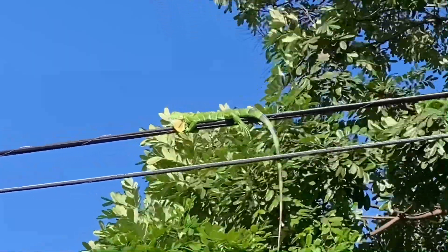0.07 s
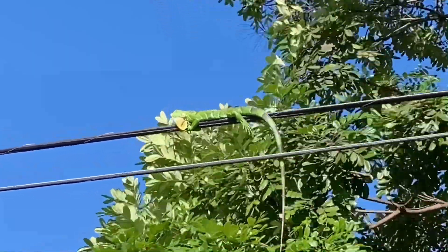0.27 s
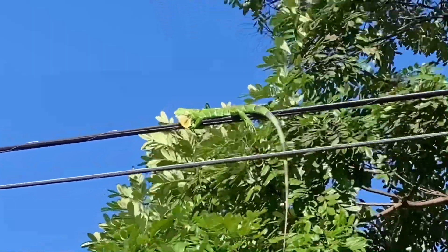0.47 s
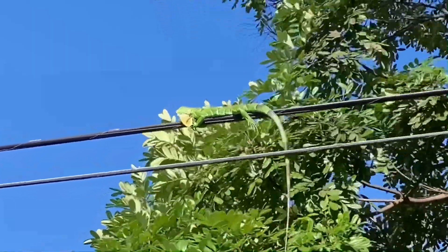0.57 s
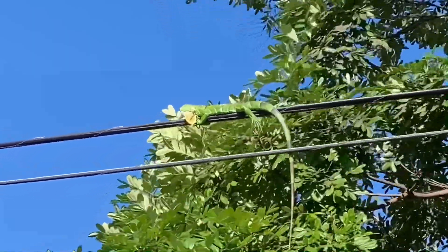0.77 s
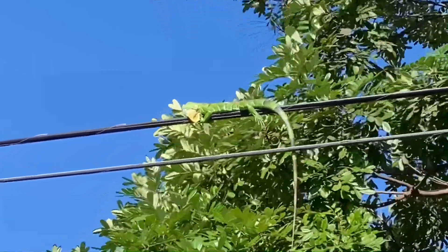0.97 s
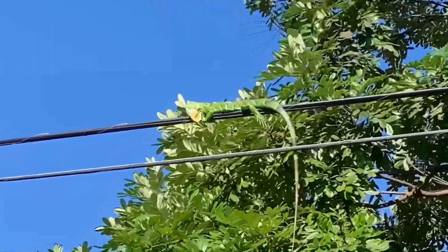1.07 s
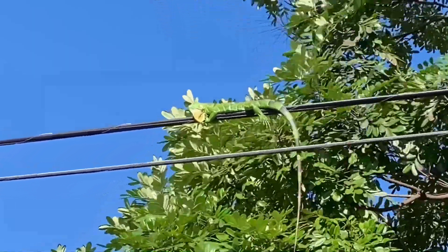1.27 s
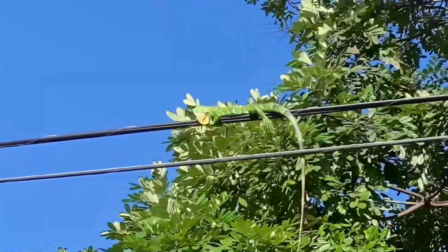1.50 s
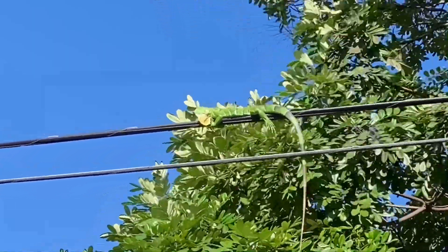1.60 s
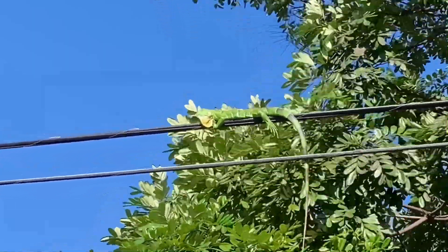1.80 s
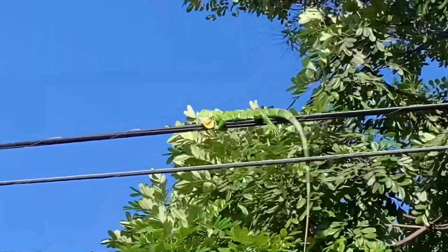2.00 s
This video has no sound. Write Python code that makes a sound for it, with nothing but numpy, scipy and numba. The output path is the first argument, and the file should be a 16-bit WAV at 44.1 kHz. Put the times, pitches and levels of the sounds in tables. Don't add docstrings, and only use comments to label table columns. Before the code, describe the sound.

Wind blasts a handheld stereo microphone outdoors. It opens with loud rumble, flutter and a tight cluster of snaps on the left, easing after 0.3 seconds into uneven low thumps and brief lulls. Around 1.4 seconds heavy flutter and crackle return, with one hard slap at 1.55 and a strong fluttering puff near 1.8. Faint steady leaf hiss and a barely audible wire hum lie beneath.

```python
import sys
import numpy as np
from scipy import signal
from scipy.fft import rfft, irfft
from scipy.io import wavfile
from scipy.ndimage import uniform_filter1d, minimum_filter1d
from numba import njit

SR = 44100
rng = np.random.default_rng(int(sys.argv[2]) if len(sys.argv) > 2 else 0)


def to_wav(s):
    ch = np.atleast_2d(s).T
    pcm = np.round(np.clip(ch, -1, 1) * 32767)
    wavfile.write(sys.argv[1], SR, pcm.astype(np.int16))


def boost(x):
    u = np.asarray(x, float) / 20
    return 10 ** u


N = 90228


def walk(rate_hz):
    hold = int(SR / rate_hz)
    steps = np.repeat(rng.standard_normal(N // hold + 1), hold)
    return 1.29 * uniform_filter1d(uniform_filter1d(steps, hold), hold)[:N]


def unit(x):
    return x / np.sqrt(np.mean(x ** 2))


def pair(like):
    mid, side = rng.standard_normal((2, N))
    opposite = np.array([[1], [-1]])
    return (np.sqrt(1 + like) * mid + np.sqrt(1 - like) * side * opposite) / np.sqrt(2)


def colour(hz, table):
    table_hz, table_db = np.array(table).T
    return boost(np.interp(np.log(hz + 1), np.log(table_hz), table_db))


@njit
def svf(x, hz, q):
    band, low, b, l = np.empty(len(x)), np.empty(len(x)), 0., 0.
    for i in range(len(x)):
        g = np.tan(np.pi * hz[i] / SR)
        v = (b + g * (x[i] - l)) / (1 + g * (g + 1 / q))
        band[i], low[i] = v / q, l + g * v
        b, l = 2 * v - b, l + 2 * g * v
    return band, low


def puffs(t, starts, holds, attack, release):
    late = t[None] - starts[:, None]
    rise = np.minimum(late / attack - 1, 0)
    fall = np.minimum((holds[:, None] - late) / release, 0)
    return np.exp(rise + fall)


def power(shapes, dbs):
    return np.sqrt(boost(dbs) ** 2 @ shapes ** 2) + 1e-6


def strongest_pitch(shapes, dbs, pitches):
    return (boost(dbs) ** 2 * pitches) @ shapes ** 2 / power(shapes, dbs) ** 2


def even(x, span_s):
    swell = uniform_filter1d(np.mean(unit(x) ** 2, axis=0), int(span_s * SR)) + 0.069
    return unit(x * swell ** (-0.72 / 2))


# start_s, level_db
GUSTS = [(0.0, -19.5), (0.04, -16), (0.29, -16), (0.36, -27), (0.46, -33), (0.5, -18), (0.7, -27.5),
         (0.79, -16.5), (0.93, -28), (0.94, -25.5), (1.08, -30), (1.16, -21.5), (1.29, -22.5),
         (1.58, -15.5), (1.62, -17.5), (1.73, -17.5), (1.9, -22), (1.93, -20.5), (2.04, -18.5)]
# frequency_hz, level_db
RUMBLE_SPECTRUM = [(12, -44.5), (20, -9.5), (65, 0.5), (125, -2.5), (184, -11), (247, -15), (282, -21.5),
                   (392, -30), (700, -45), (910, -61), (1540, -120)]


def rumble(t):
    hz = np.fft.rfftfreq(N, 1 / SR)
    spectrum = rfft(pair(0.66)) * colour(hz, RUMBLE_SPECTRUM)
    gust = boost(np.interp(t, *np.array(GUSTS).T) - 3)
    shared = walk(14)
    out = 0
    for centre_hz in 25 * 2 ** np.arange(0, 5.1, .5):
        octaves = np.log2((hz + 1) / centre_hz)
        share = np.cos(np.pi * np.clip(octaves, -.5, .5)) ** 2
        brightness_db = 0.078 * (20 * np.log10(gust) + 24) + .9 * shared
        flicker_db = np.log2(centre_hz / 50) * brightness_db + 4.6 * walk(24.97)
        out = out + irfft(spectrum * share, N) * boost(flicker_db)
    return even(out, 0.035) * gust


# start_s, peak_db, pitch_hz, hold_s
THUMPS = [(0.03, -12, 220, .015), (0.05, -9, 125, 0.026), (0.097, -12.5, 66, 0.012),
          (0.2, -15.5, 123, 0.024), (0.265, -14.5, 108, 0.03), (0.491, -11, 54.7, 0.02),
          (0.577, -20.5, 176, 0.027), (0.651, -25.5, 47.3, 0.018), (0.77, -10, 64, 0.019),
          (0.804, -13.5, 75, 0.037), (0.927, -18.5, 77, 0.023), (1.137, -8.5, 65, 0.045),
          (1.203, -12, 67.3, 0.025), (1.262, -18, 86.5, 0.046), (1.328, -15.5, 132.4, 0.052),
          (1.388, -9, 230, 0.05), (1.453, -10.5, 167, 0.021), (1.533, -10, 141.4, 0.025),
          (1.626, -18, 75.8, 0.015), (1.66, -14, 190, .015), (1.695, -7, 68.4, 0.021),
          (1.747, -13.5, 94.2, 0.03), (1.848, -21, 74.5, 0.012), (1.914, -14, 45.4, 0.024),
          (2, -20.5, 169, 0.029)]


def thumps(t):
    start, db, pitch, hold = np.array(THUMPS).T
    shapes = puffs(t, start, hold, attack=0.0048, release=0.021)
    hz = strongest_pitch(shapes, db, pitch) + 1
    q = 1.41
    band = np.array([svf(svf(x, hz, q)[0], hz, q)[0] for x in pair(0.74)])
    return even(band * (80 / hz) ** .5, 0.029) * power(shapes, db) * boost(-7)


# start_s, peak_db, crackle_over_peak_db, pitch_hz, hold_s
EDDIES = [(0.022, -11.5, -4, 229, 0.019), (0.04, -13.5, -13, 268, 0.013), (0.072, -14, -20, 252, 0.015),
          (0.159, -22, -17.5, 283, 0.029), (0.205, -15.5, -22, 340, 0.014), (0.25, -16, -14.5, 254, 0.022),
          (0.536, -27.5, -22, 337, 0.021), (0.569, -19.5, -27, 314, 0.015),
          (0.7735, -19, -21.5, 290, 0.015), (0.806, -22, -43, 305, 0.018), (1.148, -21.5, -33, 324, 0.013),
          (1.175, -19.5, -48.5, 309, 0.014), (1.308, -24.5, -29, 360, 0.019),
          (1.387, -7.5, -16, 265, 0.017), (1.407, -8, -15.5, 376, 0.03), (1.435, -10.5, -7.5, 336, 0.019),
          (1.454, -9.5, -16.5, 367, 0.023), (1.479, -20, -10, 396, 0.016), (1.525, -15, -11, 264, 0.017),
          (1.712, -16.5, -8.5, 253, 0.016), (1.751, -22, -15, 330, .008), (1.764, -14, -23, 287, 0.018),
          (1.784, -8, -31, 454, 0.011), (1.998, -17.5, -22, 300, 0.02)]
# start_s, peak_db, crackle_over_peak_db, pitch_hz, hold_s
FLICKS = [(0.13, -20.5, -17, 260, 0.0076), (0.291, -25, -19, 292, 0.0033), (0.327, -31, -9, 350, 0.0037),
          (0.553, -25, -29, 281, 0.0081), (0.65, -32, -25, 262, 0.0043), (0.691, -28, -40, 280, 0.0071),
          (0.843, -27.5, -26, 269, 0.0099), (0.942, -17.5, -33, 297, 0.006), (1.24, -41.5, -20, 252, 0.01),
          (1.348, -24, -32, 356, 0.0065), (1.507, -12, -37, 393, 0.0048), (1.551, -14, -12, 326, 0.004),
          (1.604, -11, -24, 242, 0.0034), (1.656, -11, -18.5, 250, 0.007), (1.7, -19, -9, 297, 0.006),
          (1.799, -1.5, -26, 398, 0.0055), (1.853, -21.5, -29, 300, 0.006), (1.91, -28, -28, 315, 0.0052),
          (1.944, -28.5, -32, 330, 0.011)]
# start_s, peak_db, crackle_over_peak_db, pitch_hz, hold_s
WHIPS = [
    (0.027, -12, -14, 600, 0.017),
    (1.78, -10.5, -25, 500, .022),
    (.128, -24.5, -11, 482, .004),
    (.252, -18, -12, 479, .005),
    (.518, -29.5, -15, 448, 0.0035),
    (0.547, -26, -18, 448, .005),
    (1.352, -25, -15, 448, .004),
    (1.663, -17.5, -20, 478, 0.0047),
]


def flutter(t):
    start, db, crackle_db, pitch, hold = np.array(EDDIES + FLICKS + WHIPS).T
    shapes = puffs(t, start, hold, attack=0.00302, release=0.0045)
    hz = np.clip(strongest_pitch(shapes, db, pitch), 150, 900) * boost(0.55 * walk(60))

    body = []
    for x in pair(0.93):
        x = svf(svf(x, hz, 1.25)[0], hz, 1.25)[0]
        body.append(svf(x, 1.76 * hz, 0.47)[1])
    body[1] = svf(body[1], 2.08 * hz, 0.68)[1]
    body = even(np.array(body) * (300 / hz) ** .5, 0.0068)

    crests = np.maximum(np.abs(body[0]) - .8, 0) ** 1.88
    grit = crests * np.sign(body[0]) * 0.77 + pair(0.98) * (0.083 + crests)
    grit = grit * boost(1.4 * walk(150))
    edge_hz = np.full(N, 883.)
    crackle = []
    for x in grit:
        x = svf(svf(x, edge_hz, 0.94)[0], 1.25 * edge_hz, 0.86)[1]
        crackle.append(svf(x, 1.52 * edge_hz, 0.5)[1])
    crackle = unit(np.array(crackle)) * power(shapes, db + crackle_db)

    body = body * power(shapes, db) * boost(np.array([[-2.8], [-3.1]]))
    return body + crackle * boost(np.array([[-.6], [-20]]))


# start_s, peak_db, width_ms, direction (push 1, suck -1)
SNAPS = [(.0262, -14, 0.32, 1), (.0330, -7, 0.21, -1), (.0347, -5.5, 0.23, 1), (0.0387, -3, 0.24, 1),
         (.0413, -7, .2, -1), (.0445, -4.5, 0.36, -1), (.1315, -27, .25, 1), (.1665, -29, 0.33, -1),
         (.2075, -27, .35, 1), (.2545, -18, 0.29, 1), (.2935, -27, 0.32, -1), (0.5208, -33, 0.29, 1),
         (.5485, -29, 0.36, -1), (0.5868, -30, .3, 1), (0.8133, -27, 0.26, 1), (1.1485, -30, 0.31, -1),
         (1.2005, -31, 0.33, 1), (1.3213, -25, 0.37, 1), (1.3942, -12, 0.24, 1), (1.4119, -20.5, 0.26, -1),
         (1.4203, -14.5, 0.28, 1), (1.4320, -12, 0.25, -1), (1.4365, -22, 0.21, 1), (1.4445, -16, 0.21, 1),
         (1.452, -12, 0.25, 1), (1.4726, -10.5, 0.27, 1), (1.5052, -14.5, 0.36, 1), (1.5395, -14.5, .3, 1),
         (1.606, -26, 0.34, -1), (1.7012, -22, .045, 1), (1.7172, -27, .2, -1), (1.7287, -25, 0.27, 1),
         (1.8035, -19, 0.19, -1)]


def snaps(t):
    out = 0
    for start, db, width_ms, way in SNAPS:
        late = (t - start) / (1.6 * width_ms / 1000)
        out = out + way * boost(db) * (1 - late ** 2 - 0.55 * late) / (1 + late ** 2) ** 2
    return out * boost(np.array([[1.5], [-12]]))


# start_s, peak_db, length_ms, edge_ms
SLAP = (1.5498, -1.5, 0.327, 0.146)


def slap(t):
    start, db, length_ms, edge_ms = SLAP
    late_ms = (t - start) * 1000
    rise = np.arctan((late_ms + length_ms / 2) / edge_ms)
    fall = np.arctan((late_ms - length_ms / 2) / edge_ms)
    push = rise - fall
    span = int(0.00076 * SR)
    rebound = 2 * 0.6 * uniform_filter1d(uniform_filter1d(push, span), span)
    out = push - rebound

    ring_hz, ring_ms, ring_db = 455, 4.3, -3.5
    after_ms = np.maximum(late_ms, 0)
    ring = -np.sin(2 * np.pi * ring_hz * after_ms / 1000)
    ring = ring * np.tanh((after_ms / 0.28) ** 2) * np.exp(-(after_ms / ring_ms) ** 3)
    push_sides, ring_sides = boost(np.array([[0.], [-14]])), boost(np.array([[0.], [-4]]))
    return out / out.max() * boost(db) * push_sides + ring * boost(ring_db) * ring_sides


# start_s, length_s, level_db
HUMS = [
    (0.29, 0.19, -54.5),
    (0.81, 0.23, -49),
]


def hum(t):
    hz = 568 * (1 + 0.0087 * walk(15.3))
    tone = np.sin(2 * np.pi * np.cumsum(hz) / SR)
    size = 0
    for start, length, db in HUMS:
        size = size + boost(db) * np.sin(np.pi * np.clip((t - start) / length, 0, 1)) ** 0.82
    return tone * size * boost(np.array([[3.5], [-8]]))


# frequency_hz, level_db
LEAF_SPECTRUM = [(200, -7), (600, -6.5), (1150, -12), (2300, -17.5), (3000, -24.5), (5500, -25.5),
                 (8500, -23), (12000, -26.5), (16000, -34.5)]


def leaves():
    level_db, lead_s, in_step_hz = -48.5, .00023, 6780
    hz = np.fft.rfftfreq(N, 1 / SR)
    rustle = rng.standard_normal((2, N)) * boost(.5 * walk(8) + .6 * walk(40))
    left, other = rfft(rustle)
    like = np.clip(0.46 * (hz - 3500) / 4000, .15, 0.46)
    early = left * np.exp(2j * np.pi * (hz - in_step_hz) * lead_s)
    right = like * early + np.sqrt(1 - like ** 2) * other
    spectrum = np.array([left, right]) * colour(hz, LEAF_SPECTRUM) * (hz > 150)
    return unit(irfft(spectrum, N)) * boost(level_db)


def scene():
    t = np.arange(N) / SR
    wind = rumble(t) + thumps(t) + flutter(t)
    ceiling, clear_s = .86, .003
    clear = 1 - 0.59 * np.exp(-((t - SLAP[0]) / clear_s) ** 2)
    wind = clear * wind / (1 + (wind / ceiling) ** 4) ** .25 + snaps(t)
    mesh = signal.cheby2(4, 26, 4200, fs=SR, output="sos")
    vent = signal.butter(2, 31.8, "high", fs=SR, output="sos")
    wind = signal.sosfilt(vent, signal.sosfilt(mesh, wind))
    return wind + slap(t) + hum(t) + leaves()


def low_pass(x):
    return signal.sosfilt(signal.butter(12, 15800, fs=SR, output="sos"), x)


# from_hz, to_hz
NO_SUM = [(8500, 9710), (12900, 14500), (15800, 22000)]
# from_hz, to_hz
NO_DIFFERENCE = [(6900, 7600), (10900, 12000), (14700, 17000)]


def record(dry):
    limit, span = .9, 200
    duck = np.minimum(limit / (np.abs(dry).max(axis=0) + 1e-9), 1)
    dry = dry * uniform_filter1d(minimum_filter1d(duck, 2 * span), span)

    hz, times, cells = signal.stft([dry[0] + dry[1], dry[0] - dry[1]], SR, nperseg=2048)
    for cell, bands in zip(cells, (NO_SUM, NO_DIFFERENCE)):
        for low_hz, high_hz in bands:
            ragged_hz = 300 * np.round(0.63 * rng.standard_normal((2, len(times))))
            below = hz[:, None] < low_hz + ragged_hz[0]
            above = hz[:, None] > high_hz + .5 * ragged_hz[1]
            cell *= below | above
    mid, side = signal.istft(cells, SR, nperseg=2048)[1][:, :N]
    mix = np.array([mid + side, mid - side]) / 2
    return low_pass(mix)


dry = scene()
out = record(dry)
to_wav(out)
```